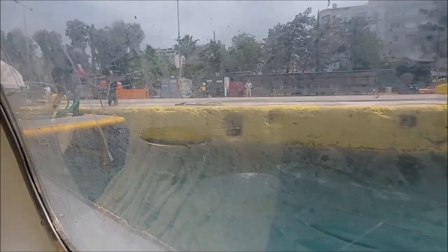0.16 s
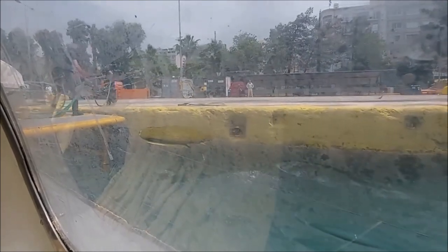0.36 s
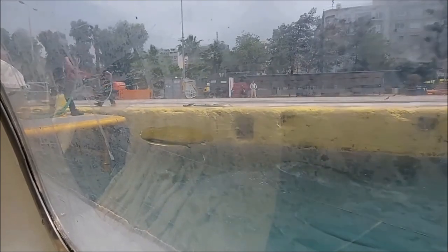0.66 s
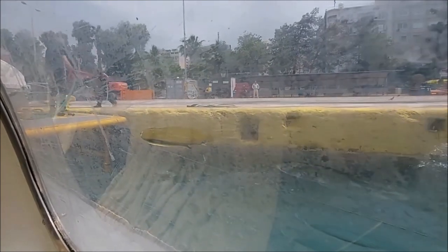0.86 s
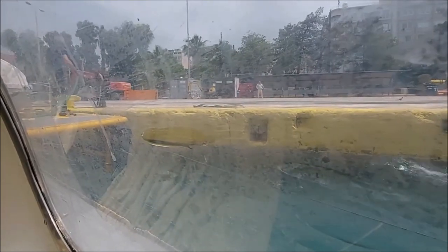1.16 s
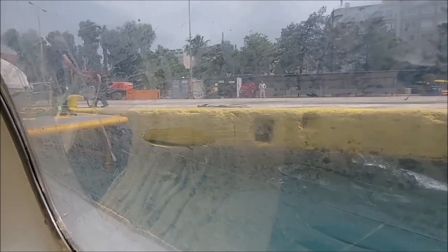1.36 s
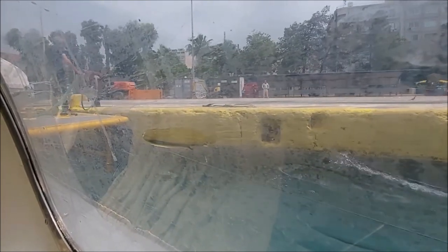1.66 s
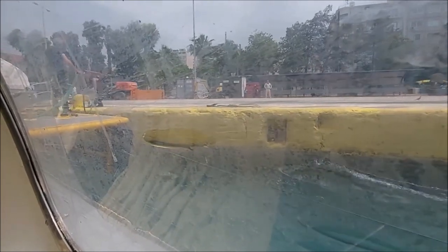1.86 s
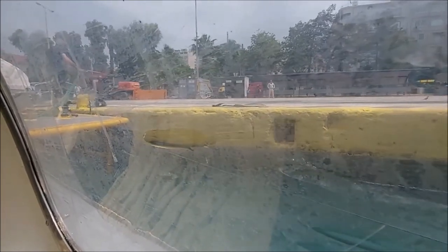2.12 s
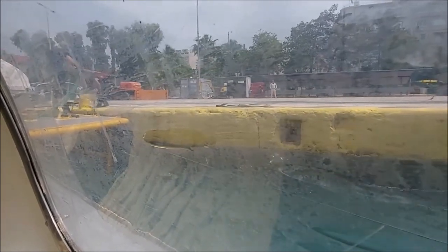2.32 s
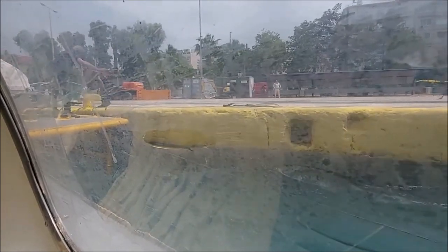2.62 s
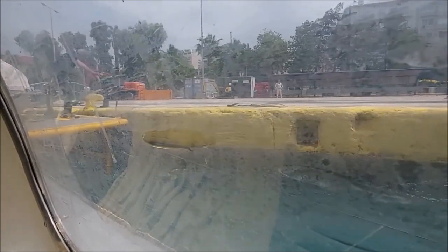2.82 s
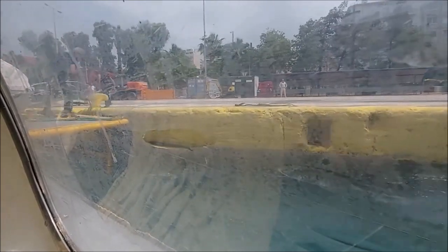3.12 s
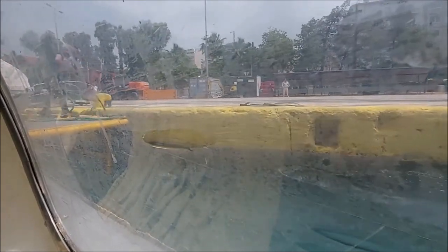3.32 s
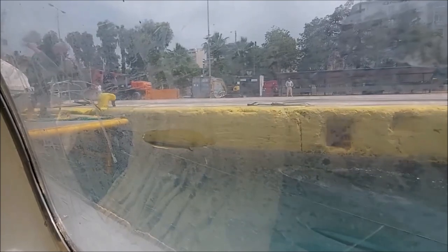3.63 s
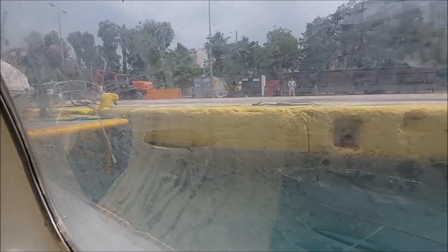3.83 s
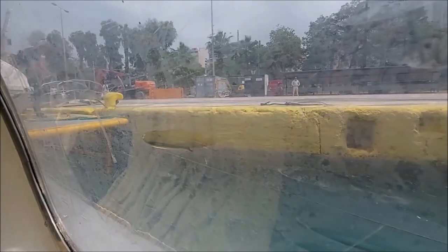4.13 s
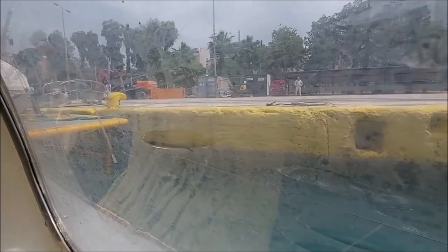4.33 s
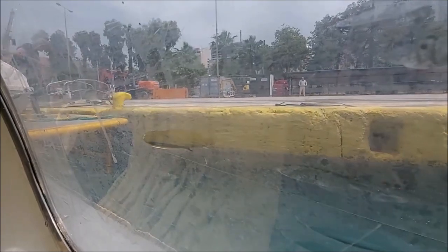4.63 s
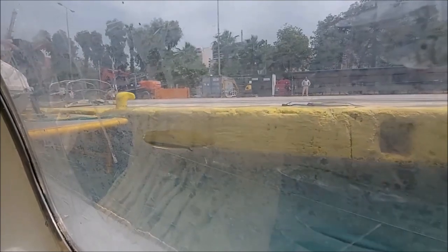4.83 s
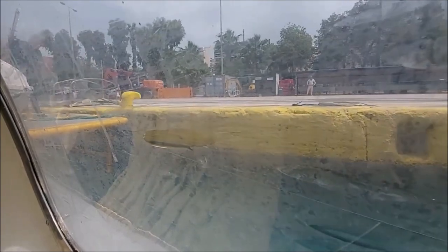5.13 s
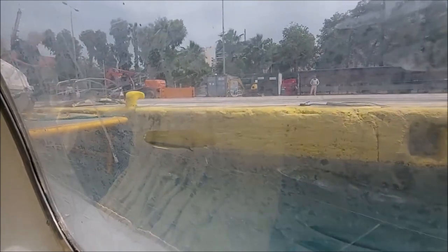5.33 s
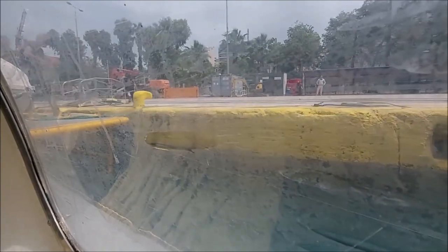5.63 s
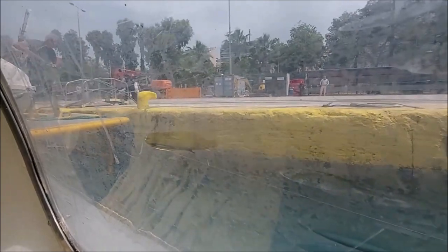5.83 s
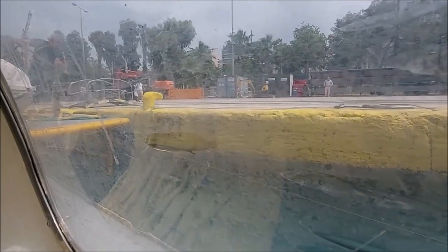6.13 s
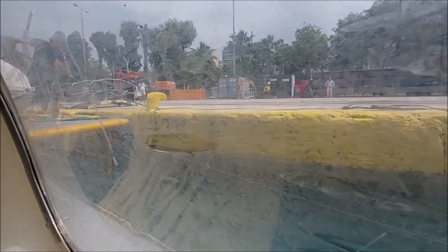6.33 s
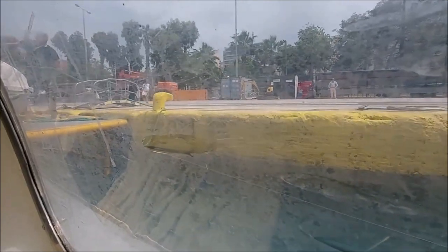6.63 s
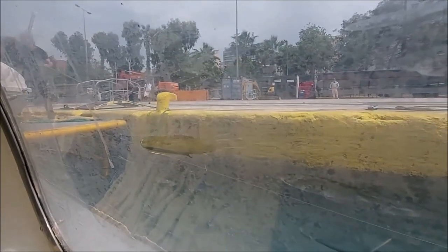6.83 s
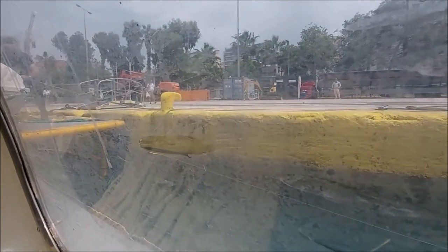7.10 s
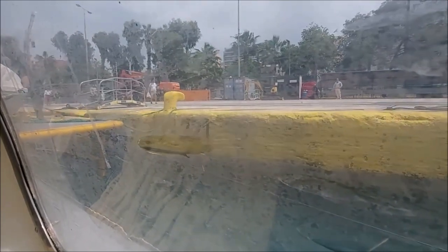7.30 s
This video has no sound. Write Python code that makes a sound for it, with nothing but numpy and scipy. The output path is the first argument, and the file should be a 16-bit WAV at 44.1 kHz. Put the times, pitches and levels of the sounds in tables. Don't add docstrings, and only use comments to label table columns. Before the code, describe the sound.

A heavy low engine hum fills an enclosed boat cabin near a quay. The boom pulses quickly at first, then holds, dips around the middle and comes back strong. Over it lie soft air hiss and faint, slightly grainy treble. Near the microphone seats and bags scuff, a latch clatters once midway, and small hard clicks and a scrape close the passage.

```python
import sys
import numpy as np
from scipy import signal
from scipy.fft import rfft, irfft
from scipy.io import wavfile
from scipy.ndimage import uniform_filter1d

SR = 44100
rng = np.random.default_rng(int(sys.argv[2]) if len(sys.argv) > 2 else 0)


def rack_gain(trim_db):
    fader = np.asarray(trim_db, float)
    return 10 ** (fader / 20)


def output_pcm(signal):
    pcm = np.clip(np.atleast_2d(signal).T, -1, 1) * 32767
    wavfile.write(sys.argv[1], SR, np.round(pcm).astype(np.int16))


N = 328986

# frequency in Hz, likeness from -1 to 1.
LIKENESS = [(60, 0.85), (130, 1), (290, 0.71), (640, 0.32), (1400, -0.19), (3070, 0.1), (6750, 0.32),
            (14800, 0.64)]
# frequency in Hz, left minus right in dB.
LEAN = [(60, -0.5), (110, -0.5), (200, -1.0), (380, -4.0), (690, -4.0), (1280, -5.0), (2360, -5.5),
        (4360, -0.5), (8040, 2.0), (14800, 5.5)]

# time in seconds, rate in Hz.
FIRING_RATE = [(0.0, 56.642), (0.3, 54.456), (0.75, 55.214), (1.5, 55.403), (2.5, 55.545), (4.0, 55.622),
               (5.0, 55.85), (6.0, 55.802), (7.46, 56.011)]
# time in seconds, slip in turns.
SLIP = [(0, .47), (.27, .19), (.475, .52), (.72, .93), (1.1, 1.22), (2.1, 1.17), (2.7, 1.27), (4.3, 1.34),
        (4.6, 1.39), (5.02, 1.49), (5.25, 1.68), (6.1, 1.77), (7, 1.66), (7.46, 1.62)]
IN_STEP_DB, FIRST_TURN = -12.4, -.31
# start in seconds, end in seconds, pitch in Hz, peak level in dB.
SHUDDER = (6.95, 7.46, 31, -25)

# time in seconds, port cycle in Hz, starboard cycle in Hz.
CYCLE_RATES = [(0, 6.95, 7.05), (.3, 6.81, 6.86), (.55, 6.83, 6.9), (.8, 6.885, 6.92), (1.1, 6.89, 6.93),
               (1.8, 6.93, 6.945), (2.3, 6.92, 6.955), (3, 6.945, 6.96), (3.7, 6.96, 6.965),
               (4, 6.945, 6.965), (4.5, 6.967, 6.98), (5.2, 6.945, 6.985), (5.6, 6.985, 6.97),
               (6.2, 6.988, 6.965), (6.65, 7.005, 6.98), (6.9, 7.045, 7.0), (7.15, 7.04, 7.01),
               (7.46, 7.025, 7.012)]
# multiple of the cycle, peak level of the port
# engine's tone in dB.
CRANK_ORDERS = [(6, -35), (7, -41), (9, -33), (10, -34), (11, -35), (13, -33), (14, -32), (15, -33),
                (16, -31), (17, -37), (18, -38), (19, -37), (20, -38), (21, -35), (22, -48), (23, -49),
                (24, -38), (25, -36), (26, -40), (27, -48), (28, -41), (29, -53), (30, -46), (32, -43),
                (33, -46), (34, -46), (35, -53), (36, -42), (37, -42), (38, -48), (39, -54), (40, -43),
                (41, -45), (42, -38), (44, -41), (45, -44),
                (46, -39), (47, -42), (48, -44), (49, -47), (50, -43), (51, -38), (52, -41), (53, -43),
                (54, -46), (55, -55), (56, -46), (57, -48), (58, -49), (59, -53), (60, -55), (61, -53),
                (62, -55), (63, -49), (64, -45), (65, -47), (66, -50), (67, -49), (68, -58), (70, -62),
                (71, -61), (72, -55), (73, -63), (74, -63), (75, -65), (76, -58), (77, -62), (78, -55),
                (79, -54), (80, -51), (81, -52), (82, -60), (83, -60), (84, -59), (85, -66), (86, -70),
                (87, -68), (88, -64), (89, -64), (90, -61), (91, -59), (92, -62), (93, -62), (94, -71),
                (95, -67), (96, -61), (97, -67), (98, -59), (100, -69)]
# time in seconds, level in dB.
LOAD = [(0, 0), (.7, 2), (1.3, -0.5), (2.2, -2), (2.7, -2), (3.4, -2), (4, -1), (4.6, 1), (5.2, 1),
        (5.6, 2.5), (6.1, 1), (6.8, -1.5), (7.46, -0.5)]
# multiple of the cycle, level in dB, start and end in seconds.
PUMP = (12.55, -31.5, 4.2, 6.8)
# time in seconds, peak level in dB.
GEAR_SONG = [(0, -72), (3.3, -66), (3.9, -51), (4.25, -58), (4.6, -54), (4.9, -66), (6.5, -64), (6.9, -50),
             (7.15, -54), (7.46, -66)]
MESH_ORDER = 98

# frequency in Hz, density in dB per Hz.
RUMBLE = [(8, -19), (20, -18.5), (32, -5.5), (45, 2), (70, 3.5), (110, 1.5), (135, -1.5), (152, -8),
          (200, -14), (260, -13), (300, -9), (355, -7.5), (380, -18), (460, -19), (500, -25), (600, -31.5),
          (780, -41.5), (1100, -37.5), (1430, -71.5), (2420, -120)]
# frequency in Hz, width in Hz, gain in dB.
PANELS = [(89.3, 20, 3.5), (225, 25, 8), (427, 38, 2.5), (575, 19, 9.5), (670, 40, 8.5)]
HULL_DB, PANEL_DB, VENT_DB = -25.5, -30, -46
HULL_DUCK_DB, PANEL_DUCK_DB, VENT_DUCK_DB, CLOTH_DUCK_DB, DUCK_S = 2, 3, 0.5, 0.5, 0.12

# frequency in Hz, density in dB per Hz.
AIR_COLOUR = [(350, -41), (600, 4.5), (698, 3), (906, -1), (1040, -3), (1200, -3.5), (2680, -9.5),
              (5420, -22), (8000, -22), (10400, -80.5), (17600, -120)]
# frequency in Hz, density in dB per Hz.
CLOTH_COLOUR = [(1470, -29), (2500, -0.5), (4070, -3.5), (4620, -4), (7250, -7), (9080, -11), (11700, -9),
                (14300, -19), (15000, -33.5)]
# time in seconds, rustle level in dB.
STIR = [(0, -51), (.2, -55.5), (.9, -55), (1.15, -63), (1.43, -58.5), (2.17, -52), (2.45, -57), (3.5, -57),
        (3.72, -55.5), (4.4, -51.5), (4.9, -57), (5.4, -52), (5.65, -58), (6.1, -52), (6.4, -55.5),
        (6.73, -50.5), (7.08, -58), (7.35, -50.5)]
STIR_TO_AIR, LATE_STIR_DB, LATE_S = 0.1, 1.5, 6.6

# start in
# seconds, rms level in dB, centre in Hz, width in octaves, decay by 60 dB in seconds.
KNOCKS = [(.0, -52, 4000, 2, .1), (0.049, -45.5, 3500, 1.7, 0.26), (3.029, -42, 3950, 1.5, 0.15),
          (3.044, -42, 4460, 0.84, 0.35), (3.06, -35, 547, 0.13, 0.71), (3.224, -37.5, 6150, 0.85, 0.16),
          (3.227, -36, 2980, 0.46, 0.21), (3.228, -38, 900, 0.6, 0.18), (3.031, -48, 2060, 0.73, 0.4),
          (3.275, -47.5, 3540, 0.72, 0.15), (5.12, -46.5, 10600, 0.098, .08), (5.132, -45, 13900, .07, .1),
          (5.167, -45, 10500, .14, 0.065), (5.2, -48, 11100, .2, 0.068), (6.105, -44, 2200, 1.1, 0.12),
          (6.141, -42, 2060, 1.1, 0.18), (6.221, -45, 2200, 0.58, 0.12), (6.549, -49, 1890, 1.4, 0.11),
          (6.688, -48, 2440, 0.38, 0.067), (6.838, -44.5, 2590, 1.4, 0.28), (7.046, -45, 2980, 0.73, 0.15),
          (3.843, -49, 2600, 0.6, 0.1), (3.908, -49, 2600, 0.56, .1), (6.276, -51.5, 2700, 0.39, 0.056)]
# start in seconds, rms level in dB, centre in Hz, width in octaves, hold in seconds.
STROKES = [(0.128, -49, 1220, 0.13, .06), (0.195, -50, 1170, 0.23, 0.064), (1.409, -56, 6800, 1.3, 0.042),
           (2.652, -58.5, 7000, 1.1, 0.11), (3.584, -54.5, 8900, 0.9, 0.02), (3.761, -50, 4500, 2, 0.097),
           (5.424, -60, 10200, 0.15, 0.036), (5.731, -51.5, 4970, 0.68, 0.058),
           (6.603, -44, 2730, 1.03, 0.074), (7.302, -53, 5970, 0.48, 0.034),
           (7.342, -34.5, 2180, 0.36, 0.02), (7.358, -37.5, 1510, 0.84, 0.013),
           (7.276, -50, 3300, 0.5, 0.017), (7.316, -48, 2720, .5, 0.013), (7.372, -46, 2180, 0.27, 0.013),
           (3.205, -47.5, 3200, 1.1, 0.021), (7.134, -50, 1060, 0.17, 0.11)]
# start in seconds, rms level in dB, centre in Hz, width in octaves, extra left minus right in dB.
SWISH = [
    (5.097, -45.5, 13700, .08, -4),
    (5.106, -45.5, 10700, 0.13, 6),
    (5.111, -50.5, 7140, 0.75, 0),
    (5.171, -46, 6100, 1, -1),
]
KNOCK_HOLD_S, STROKE_T60_S, SWISH_END_S, SWISH_T60_S = 0.011, 0.12, 5.238, 0.012

# start in seconds, peak in dB, ring in Hz, decay by 60 dB in seconds, left minus right in dB.
CLICKS = [(3.033, -43, 2400, .05, -14), (3.034, -49, 4530, .03, 7), (3.05, -42, 4750, .04, 2),
          (3.052, -45, 4340, .03, 3), (3.062, -48, 2390, 0.069, -4), (3.229, -37, 5100, 0.054, -7),
          (3.229, -37, 2910, 0.062, -12), (3.23, -42, 1136, 0.09, -10), (3.229, -37, 2050, 0.051, -5),
          (3.232, -39, 4220, 0.071, -8), (3.245, -40, 2980, 0.052, -5), (3.853, -43, 2800, 0.016, -1),
          (3.855, -45, 2200, .015, 2), (3.913, -42, 2500, .03, -3), (3.916, -45, 2920, .02, -3),
          (4.015, -44, 1500, .04, -3), (6.143, -37, 1950, .015, -2), (6.143, -49, 2750, .015, -3),
          (6.2, -41, 1990, 0.022, -2), (6.225, -40, 1790, .02, -4), (6.279, -36, 2770, 0.01, -7),
          (6.552, -42, 1770, .04, 1), (6.693, -32, 5300, 0.0023, -28), (6.6937, -31, 1880, 0.0059, -5),
          (6.7134, -20, 250, 0.0061, -1), (6.795, -40, 10350, 0.019, 15), (6.845, -42, 2100, 0.046, -4),
          (7.046, -43, 2590, 0.044, -7), (7.047, -44, 2040, .05, -5), (7.351, -34, 2300, 0.018, -8),
          (7.362, -30, 2470, 0.022, -8), (7.367, -31, 1900, .02, -6), (7.393, -38, 2100, .03, -4),
          (7.405, -39, 2240, .02, 0), (7.416, -43, 2300, .015, -4)]

# frequency in Hz, step size in dB.
TREBLE_STEPS = [(1500, -61), (3000, -55), (4500, -48.5), (8000, -49), (9000, -47), (10000, -50),
                (12500, -49.5), (14500, -52)]
# time in seconds, depth of the thinning in dB.
THINNING = [(0.27, 12), (0.293, 7), (0.363, 16), (0.572, 15), (0.664, 9), (0.734, 14), (0.757, 11),
            (0.827, 19), (0.92, 22), (0.99, 15), (1.036, 17), (1.059, 13), (1.082, 19), (1.129, 18),
            (1.152, 27), (1.175, 13), (1.199, 20), (1.222, 28), (1.245, 23), (1.291, 10), (1.315, 24),
            (1.338, 10), (1.407, 9), (1.477, 13), (1.524, 12), (1.57, 17), (1.616, 10), (1.64, 14),
            (1.709, 15), (1.733, 20), (1.802, 16), (1.872, 7), (1.895, 11), (1.942, 12), (1.965, 25),
            (2.058, 8), (2.127, 7), (2.29, 17), (2.36, 12), (2.383, 9), (2.452, 16), (2.499, 9),
            (2.522, 23), (2.545, 12), (2.615, 14), (2.685, 7), (2.777, 16), (2.847, 19), (2.917, 8),
            (2.94, 15), (3.01, 12), (3.103, 7), (3.126, 7), (3.149, 15), (3.172, 27), (3.335, 10),
            (3.358, 14), (3.381, 8), (3.404, 20), (3.428, 7), (3.451, 8), (3.474, 9), (3.497, 13),
                 (3.544, 16), (3.567, 24), (3.637, 12), (3.66, 12), (3.706, 10), (3.729, 10), (3.962, 14),
                 (4.356, 10), (4.751, 8), (4.867, 9), (4.983, 7), (5.007, 10), (5.03, 18), (5.053, 16),
                 (5.076, 15), (5.099, 14), (5.262, 14), (5.285, 9), (5.308, 12), (5.332, 12), (5.355, 13),
                 (5.378, 8), (5.541, 7), (5.587, 16), (5.634, 15), (5.657, 28), (5.703, 9), (5.819, 10),
                 (5.889, 11), (5.982, 19), (6.051, 9), (6.284, 17), (6.33, 8), (6.353, 27), (6.377, 21),
                 (6.4, 8), (6.423, 9), (6.446, 29), (6.469, 16), (6.493, 15), (6.516, 22), (6.586, 7),
                 (6.771, 10), (6.957, 10), (7.027, 7), (7.12, 9), (7.143, 19), (7.166, 10), (7.189, 10)]
TOP_EDGE_HZ, BLOCK_START = 14670, 630
TROUGH_DB, TROUGH_FROM = 3, -.02


def evened(x):
    return x / np.sqrt(np.mean(x ** 2) + 1e-20)


def read(points, hz):
    f, value = np.transpose(points)
    return np.interp(np.log(hz + 1), np.log(f + 1), value)


def curves(rows):
    s, *columns = np.transpose(rows)
    return [np.interp(np.arange(N) / SR, s, c) for c in columns]


def drift(top_hz):
    t = np.arange(0, N, 256) / SR
    rates = np.geomspace(top_hz / 10, top_hz, num=12)
    slow = sum(np.sin(2 * np.pi * (f * t + rng.random())) / np.sqrt(f) for f in rates)
    return np.interp(np.arange(N) / SR, t, evened(slow))


def sides(lean_db):
    return np.array([[.5], [-.5]]) * lean_db


def place(x, hz):
    return x * rack_gain(sides(read(LEAN, hz)))


def noise(colour_db, size, patchy_db=0.):
    frames, hz = 4 * N // size + 5, np.fft.rfftfreq(size, 1 / SR)
    a, b, c, d, patches = rng.standard_normal((frames, len(hz), 5)).T
    patches = uniform_filter1d(patches, size=12, axis=0)
    patches = evened(uniform_filter1d(patches, size=8, axis=1))
    same = np.clip(read(LIKENESS, hz), -1, 1)[:, None]
    left = a + 1j * b
    right = same * left + np.sqrt(1 - same ** 2) * (c + 1j * d)
    z = np.array([left, right])
    z *= rack_gain(colour_db(hz)[:, None] + patchy_db * patches)
    z *= rack_gain(sides(read(LEAN, hz)))[:, :, None]
    return evened(signal.istft(z, nperseg=size, noverlap=size * 3 // 4)[1][:, :N])


def in_step():
    return np.cos(np.pi * curves(SLIP)[0])


def ducked(duck_db):
    loudness = uniform_filter1d(in_step() ** 2, size=max(round(DUCK_S * SR), 1))
    return rack_gain(-duck_db * loudness / .5)


def boom():
    hz, = curves(FIRING_RATE)
    level = in_step() * rack_gain(IN_STEP_DB + .7 * drift(4.))
    tone = level * np.cos(2 * np.pi * (np.cumsum(hz) / SR + FIRST_TURN))
    start, end, shake_hz, shake_db = SHUDDER
    t = np.arange(N) / SR
    swell = np.sin(np.pi * np.clip((t - start) / (end - start + 0.028), 0, 1))
    shake = rack_gain(shake_db) * swell * np.sin(2 * np.pi * shake_hz * t)
    return place(tone + shake, hz[0])


def orders(turns):
    slow, t = turns[:, ::16], np.arange(0, N, 16) / SR
    out, knots = np.zeros((2, len(t))), np.linspace(0, N / SR, num=16)
    cold_db = np.interp(t, [2, 3.5], [-9, 0])
    ease_db = np.interp(t, [7.1, 7.3], [0, -6])
    load_db = curves(LOAD)[0][::16]
    for k, db in CRANK_ORDERS:
        wander = np.interp(t, knots, np.cumsum(rng.standard_normal(len(knots))))
        a, b = rng.random((2, 1)) + .1 * wander
        port = np.sin(2 * np.pi * (k * slow[0] + a))
        starboard = (.55 if k < 30 else .3) * np.sin(2 * np.pi * (k * slow[1] + b))
        waver_db = 2 * np.interp(t, knots, rng.standard_normal(len(knots)))
        level_db = db + waver_db + load_db + (k > 85) * cold_db + (k > 29) * ease_db
        level_db = level_db + (77 < k < 82) * 2 - (k == MESH_ORDER) * 8
        out += place(rack_gain(level_db) * (port + starboard), k * 7)
    k, db, start, end = PUMP
    on = np.clip(np.minimum(t - start, end - t) / .3, 0, 1) * abs(np.cos(2.2 * (t - 4.75)))
    out += place(rack_gain(db) * on * np.sin(2 * np.pi * k * slow[0]), k * 7)
    gear_level = rack_gain(curves(GEAR_SONG)[0][::16])
    out += place(gear_level * np.sin(2 * np.pi * MESH_ORDER * slow[0]), MESH_ORDER * 7)
    return signal.resample_poly(out, up=16, down=1, axis=1)[:, :N]


def rumble(turns, throb=0.014):
    def panels_db(hz):
        return read(RUMBLE, hz) + sum(db / (1 + (2 * (hz - f) / w) ** 2) for f, w, db in PANELS)

    def hull_db(hz):
        boom_gap_db = 17 / (1 + ((hz - 55) / 7) ** 2)
        return panels_db(hz) - 40 * (hz > 195) - boom_gap_db

    hull = noise(hull_db, size=8192, patchy_db=1.1)
    panel = noise(lambda hz: panels_db(hz) - 40 * (hz <= 195), size=4096, patchy_db=.9)
    beat = 1 + throb * (np.cos(2 * np.pi * turns[0]) + np.cos(2 * np.pi * turns[1]))
    hull = rack_gain(HULL_DB) * ducked(HULL_DUCK_DB) * hull
    return hull + rack_gain(PANEL_DB) * ducked(PANEL_DUCK_DB) * panel * beat


def air():
    cloth_db, = curves(STIR)
    late = np.clip(np.arange(N) / SR - LATE_S + .5, 0, 1)
    air_db = VENT_DB + STIR_TO_AIR * (cloth_db + 57.5) + LATE_STIR_DB * late
    vent = rack_gain(air_db) * noise(lambda hz: read(AIR_COLOUR, hz), size=1024, patchy_db=1.55)
    cloth = rack_gain(cloth_db) * noise(lambda hz: read(CLOTH_COLOUR, hz), size=512, patchy_db=2.2)
    return vent * ducked(VENT_DUCK_DB) + cloth * ducked(CLOTH_DUCK_DB)


def scuffs(grit_db=0.0):
    out = np.zeros((2, N))
    hz = np.fft.rfftfreq(16384, 1 / SR) + 1
    t = np.arange(16384) / SR
    rows = [(*row[:4], KNOCK_HOLD_S, row[4], 0) for row in KNOCKS]
    rows += [(*row, STROKE_T60_S, 0) for row in STROKES]
    rows += [(*row[:4], .9 * (SWISH_END_S - row[0]), SWISH_T60_S, row[4]) for row in SWISH]
    for s, db, centre_hz, octaves, hold, t60, pan_db in rows:
        rise = .002 + .08 * hold
        grit = evened(uniform_filter1d(rng.standard_normal(len(t)), size=60))
        raw = rng.standard_normal((2, len(t))) * rack_gain(grit_db * grit)
        band_db = -6.5 * abs(np.log2(hz / centre_hz) / octaves) ** 1.07
        shape = rack_gain(band_db + sides(read(LEAN, hz) + pan_db))
        tail_db = -60 * np.maximum(t - rise - hold, 0) / t60
        puff = evened(irfft(rfft(raw) * shape)) * np.minimum(t / rise, 1) * rack_gain(db + tail_db)
        part = out[:, round(s * SR):][:, :len(t)]
        part += puff[:, :part.shape[1]]
    return out


def clicks():
    out, t = np.zeros((2, N)), np.arange(4000) / SR
    for s, db, hz, t60, pan_db in CLICKS:
        rough = 0.14 * rng.standard_normal(len(t))
        ring = -rack_gain(db - 60 * t / t60) * (np.cos(2 * np.pi * hz * t) + rough)
        part = out[:, round(s * SR):][:, :len(t)]
        part += ring[:part.shape[1]] * rack_gain(sides(pan_db))
    return out


def scene():
    turns = np.cumsum(curves(CYCLE_RATES), axis=1) / SR
    return boom() + orders(turns) + rumble(turns) + air() + scuffs() + clicks()


def thinned_treble(x, thin_gain=.8, block_db=2.2, band_db=3.5, follow=.5, dead=.62, size=1024):
    n, k = np.arange(2 * size), np.arange(size)
    window = signal.windows.kaiser_bessel_derived(2 * size, 4 * np.pi)
    waves = np.cos(np.pi / size * np.outer(k + .5, n + .5 + size / 2))
    basis = window * waves * np.sqrt(2 / size)
    count, lead = N // size + 3, size - BLOCK_START
    padded = np.pad(x, ((0, 0), (lead + size, count * size - N - lead)))
    blocks = padded.reshape(2, count + 1, size)
    c = np.concatenate([blocks[:, :-1], blocks[:, 1:]], axis=2) @ basis.T
    hz = (k + .5) * SR / 2 / size

    coarse_db = block_db * rng.standard_normal(count) - 1
    boom_band = signal.butter(2, [48, 63], "band", fs=SR, output="sos")
    bass = signal.sosfiltfilt(boom_band, x.mean(0))
    starts = np.clip(np.arange(count) * size - lead - size, 0, N - 1)
    trough = np.maximum(-bass[starts] / rack_gain(IN_STEP_DB) - TROUGH_FROM, 0)
    thin_db = TROUGH_DB * trough * rng.uniform(.7, 1.3, count)
    s = (starts + size) / SR
    thin_db += sum((3 + .45 * db) * (abs(s - at) < .012) for at, db in THINNING)
    coarse_db, lost_db = coarse_db + thin_gain * thin_db, .2 * thin_db
    treble_db = 10 * np.log10((c[:, :, hz > 4000] ** 2).mean((0, 2)) + 1e-12)
    coarse_db += follow * np.maximum(treble_db + 54, 0)

    hole_shape = 12 * np.exp(-((hz - 3850) / 260) ** 2) + 3 * (abs(hz - 4800) < 1900)
    hole_db = np.outer((s > 5.1) * (s < 5.2), hole_shape)
    bands_db = band_db * np.repeat(rng.standard_normal((2, count, size // 32)), 32, axis=2)
    step = rack_gain(read(TREBLE_STEPS, hz) + coarse_db[:, None] + bands_db + hole_db)
    c = c * rack_gain(-np.outer(lost_db, np.clip(hz / 1500 - 1.4, 0, 1)))
    stepped = np.sign(c) * step * np.floor(abs(c) / step + 1 - dead)
    c = np.where(hz > 1000, stepped, c) * (hz < TOP_EDGE_HZ)
    halves = (c @ basis).reshape(2, count, 2, size)
    return (halves[:, :-1, 1] + halves[:, 1:, 0]).reshape(2, -1)[:, lead:lead + N]


def low_pass(x):
    return signal.sosfilt(signal.butter(12, 15430, fs=SR, output="sos"), x)


def record(dry):
    mix = thinned_treble(dry)
    return low_pass(mix)


dry = scene()
out = record(dry)
output_pcm(out)
```